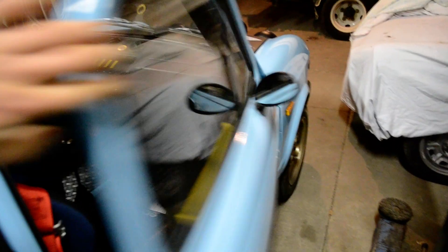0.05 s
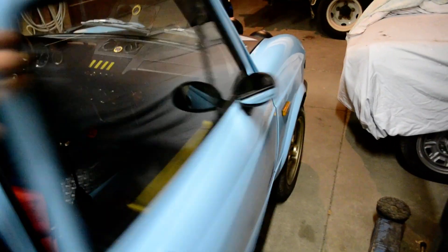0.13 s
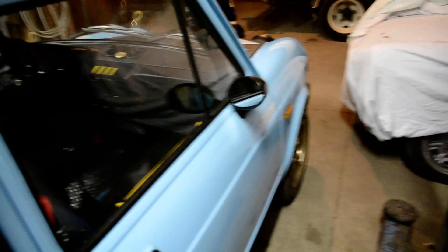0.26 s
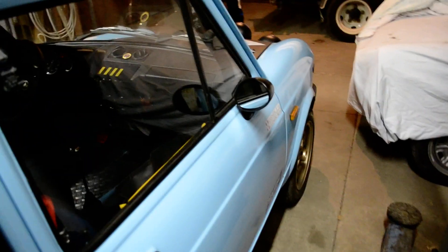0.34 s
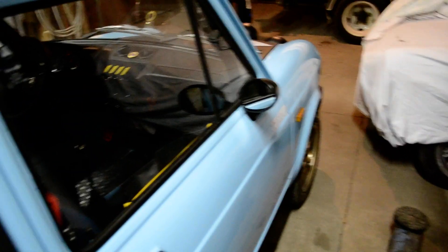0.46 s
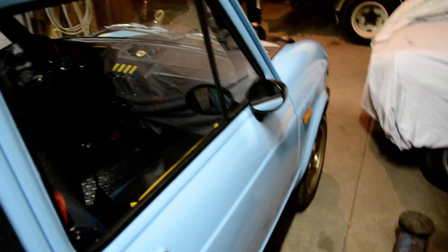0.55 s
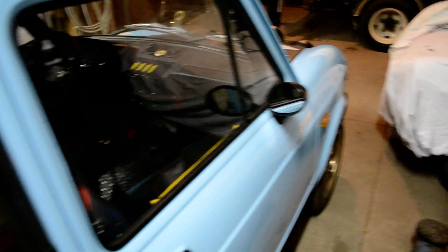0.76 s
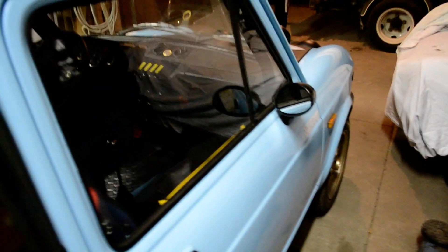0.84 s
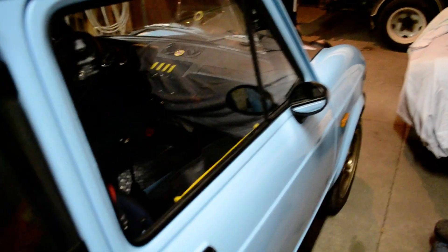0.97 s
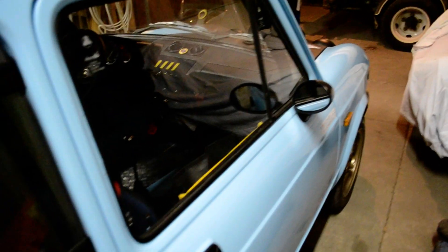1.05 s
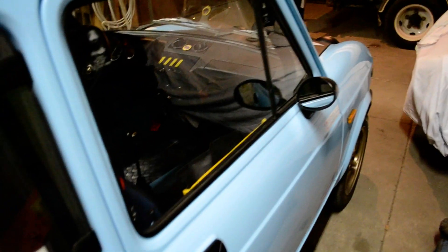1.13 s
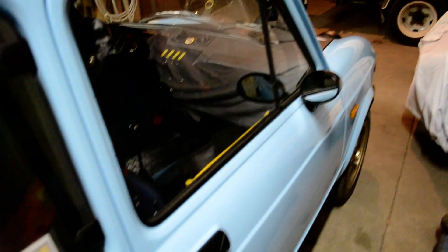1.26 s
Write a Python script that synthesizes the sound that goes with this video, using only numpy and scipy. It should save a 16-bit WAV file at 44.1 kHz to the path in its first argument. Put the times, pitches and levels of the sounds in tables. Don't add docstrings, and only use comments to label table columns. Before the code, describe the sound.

Car door slam: a soft rush of air and brief rubber seal scrape, then one loud distorted metal bang with hollow boom, rattling window and garage reverberation, followed by quiet room hush, small camera knocks and sleeve rustle.

```python
import sys
import numpy as np
from scipy import signal
from scipy.fft import rfft, irfft, next_fast_len
from scipy.io import wavfile

SR = 44100
rng = np.random.default_rng(int(sys.argv[2]) if len(sys.argv) > 2 else 0)


def unload_audio(sound):
    columns = np.transpose(np.atleast_2d(sound))
    steps = np.round(np.clip(columns, -1, 1) * 32767)
    wavfile.write(sys.argv[1], SR, steps.astype(np.int16))


def undo_db(level):
    steps = np.asarray(level, float) / 20
    return 10 ** steps


N = 57330
TIME_S = np.arange(N) / SR
SLAM_S = .2097


def unit(x):
    return x / np.sqrt(np.mean(x ** 2) + 1e-20)


def along(points, hz):
    point_hz, value = np.transpose(points)
    return np.interp(np.log(hz + 1), np.log(point_hz + 1), value)


def filtered(x, response):
    size = next_fast_len(len(x) + SR // 20)
    f = np.fft.rfftfreq(size, 1 / SR)
    return irfft(rfft(x, size) * response(f), size)[:len(x)]


def coloured(x, curve):
    return filtered(x, lambda f: undo_db(along(curve, f)))


def peak(f, hz, width_hz):
    damping = 1j * f * width_hz
    return damping / (hz * hz - f * f + damping)


def rise(t, attack_s):
    return 1 - np.exp(-t / attack_s)


def add(out, s, x):
    part = out[round(s * SR):][:len(x)]
    part += x[:len(part)]


def dying(t60s):
    hz, t, z = signal.stft(rng.standard_normal(N), SR, nperseg=512)
    fade = undo_db(-60 * t / along(t60s, hz)[:, None])
    return signal.istft(z * fade, SR, nperseg=512)[1][:N]


def contacts(rows, width):
    out, t = np.zeros(N), np.arange(SR // 16) / SR
    for s, db, hz, t60 in rows:
        fade = undo_db(-60 * t / t60) * rise(t, .0002)
        band = filtered(rng.standard_normal(len(t)), lambda f: peak(f, hz, width * hz) ** 2)
        level = undo_db(db - 6) * np.sqrt(np.mean(fade ** 2))
        add(out, s, level * unit(fade * band))
    return out


def ringing(modes, attack_s):
    out = np.zeros(N)
    for hz, db, t60 in modes:
        phase, twin_phase, spread = rng.random(3)
        twin_hz = hz * (1 + 0.022 * (spread - .5))
        pair = np.sin(2 * np.pi * (hz * TIME_S + phase))
        pair += 0.5 * np.sin(2 * np.pi * (twin_hz * TIME_S + twin_phase))
        out += undo_db(db - 60 * TIME_S / t60) * pair
    return out * rise(TIME_S, attack_s)


# start in s, peak in dB, centre in Hz, t60 in s.
LATCH_BLOWS = [(.2045, -28, 1700, 0.017), (.2078, -12, 1398, 0.037), (.2097, 7, 1411, 0.019),
               (.2100, -2.5, 2900, .018), (.2122, 3.5, 1200, 0.014), (.2165, -5, 1700, 0.012),
               (.2180, -9.5, 3300, 0.048), (.2255, -2.5, 850, .022), (.2283, -6.5, 850, .022),
               (.2400, -10.5, 1700, 0.067), (.2450, -13.5, 400, 0.11), (.2590, -12, 450, .07),
               (.2990, -14.5, 890, 0.11), (.3580, -20, 704, 0.047)]


def latch_blows():
    return contacts(LATCH_BLOWS, .9)


# frequency in Hz, level in dB, t60 in s.
STRIKER_MODES = [(1252, -12, 0.081), (1775, -11.5, 0.051), (2374, -15, .05), (3383, -12.5, .07),
                 (3550, -13.5, 0.073)]


def striker():
    return ringing(STRIKER_MODES, .0004)


# frequency in Hz, level in dB, t60 in s.
PANEL_MODES = [(135, -18.5, 0.82), (343.4, -15.5, 0.35), (449.7, -2.5, 0.16), (568, -19, 0.51),
               (595.4, -15.5, 0.38), (645, -7.5, 0.43), (802, -1.5, 0.29), (999, -10.5, 0.45),
               (1168, -19.5, 0.66), (1238, -11, 0.27), (1319, -27, 0.73), (1394, -12.5, 0.38)]


def panels():
    return undo_db(-25) * ringing(PANEL_MODES, .03)


# frequency in Hz, level in dB, t60 in s.
CABIN_MODES = [(33, -1, 1.35), (54.7, -2.5, 1.6), (89.8, 3.5, 1.1), (110, -7, 1.8), (118, -8, 2.2),
               (132.1, 9, .8), (161, -5, 1.4), (205, 10.5, .45), (257.9, 8.5, 0.41), (352, 1, 1.3)]


def cabin():
    return undo_db(-40.5) * ringing(CABIN_MODES, .017)


# frequency in Hz, density in dB per Hz.
SHELL_COLOUR = [(30, -21.5), (70, -23), (160, -6.5), (440, -5), (800, -5.5), (1400, -9), (3500, -14.5),
                (4600, -17.5), (9000, -28.5)]
# frequency in Hz, t60 in s.
SHELL_DECAY = [(60, 1.3), (150, 0.73), (500, 0.5), (2000, 0.57), (3500, 0.57), (5000, .38), (8000, .33)]


def shell():
    noise = coloured(dying(SHELL_DECAY), SHELL_COLOUR)
    noise = noise / np.std(noise[:SR // 20])
    return undo_db(-16.5) * noise * rise(TIME_S, .008)


def body():
    out = np.zeros(N)
    add(out, SLAM_S, shell() + panels() + cabin() + striker())
    return out


# start in s, peak in dB, centre in Hz, t60 in s.
RATTLE_HITS = [
    (.2097, -18, 5800, 0.021),
    (.2255, -17, 9100, .025),
    (.2390, -6.5, 7000, .022),
    (.2450, -22, 7500, .08),
    (.2560, -21.5, 7000, .03),
    (.2720, -21, 6500, .04),
    (.3000, -27, 6000, .03),
    (.3140, -20.5, 8500, 0.023),
    (.3100, -28, 6340, 0.04),
    (.3310, -25, 5880, 0.038),
]


def rattles():
    return contacts(RATTLE_HITS, .7)


# centre in Hz, width in Hz, level in dB.
SEAL_RESONANCES = [(220, 150, -9), (550, 170, -2.5), (930, 120, -3), (1280, 300, -2), (1750, 340, -2.5),
                   (2200, 850, -7), (4700, 3200, -24.5), (8000, 6000, -39)]


def seal():
    start_s, slips_per_s = .1635, 2500
    start_db, swell_db, attack_s = -40, 3, .005
    t = np.arange(round((SLAM_S - start_s) * SR)) / SR
    slips = (rng.random(len(t)) < slips_per_s / SR) * rng.standard_normal(len(t))
    slips += .08 * rng.standard_normal(len(t))

    def door(f):
        return sum((-1) ** k * undo_db(db) * peak(f, hz, width_hz) ** 2
                   for k, (hz, width_hz, db) in enumerate(SEAL_RESONANCES))

    out = np.zeros(N)
    swell = undo_db(start_db + swell_db * t / t[-1])
    add(out, start_s, unit(filtered(slips, door)) * swell * rise(t, attack_s))
    return out


def swing():
    level_db, swell_db = -69, 4
    air = unit(filtered(rng.standard_normal(N), lambda f: peak(f, 267, 260) ** 2))
    return undo_db(level_db + swell_db * TIME_S / SLAM_S) * (TIME_S < SLAM_S) * air


# frequency in Hz, t60 in s.
NEAR_DECAY = [(50, 1.6), (150, 1.1), (500, 0.55), (2000, 0.53), (3500, 0.62), (5000, .42), (8000, 0.27)]
# frequency in Hz, t60 in s.
FAR_DECAY = [(50, 1.4), (500, 1.63), (2000, 1.15), (4000, 0.68), (8000, .4)]


def garage(x):
    level_db, far_db, wall_s = -8, -18, .018
    near, far = dying(NEAR_DECAY), dying(FAR_DECAY)
    tail = near / np.linalg.norm(near) + undo_db(far_db) * far / np.linalg.norm(far)
    delayed = np.pad(x, (round(wall_s * SR), 0))
    return undo_db(level_db) * signal.fftconvolve(delayed, tail)[:N]


# start in s, peak in dB, centre in Hz, t60 in s.
CAMERA_TICKS = [
    (.1420, -43.5, 3450, .018),
    (.7365, -50.5, 7000, 0.064),
    (.7600, -50, 8000, .06),
    (.9920, -41.5, 4240, 0.0092),
    (1.0130, -45.5, 5500, 0.022),
    (1.0400, -51, 4000, 0.014),
    (1.1650, -48, 8500, .02),
    (1.1780, -47, 8000, .02),
    (1.2285, -42, 8500, .015),
]


def ticks():
    return contacts(CAMERA_TICKS, 1.3)


# start in s, peak in dB, centre in Hz, t60 in s.
CAMERA_KNOCKS = [
    (.1430, -53, 708, .03),
    (.7600, -39.5, 1600, 0.032),
    (.7720, -55, 2340, 0.046),
    (.7800, -47, 1996, 0.079),
    (1.0665, -45.5, 1190, 0.024),
    (1.1200, -55.5, 1510, 0.069),
    (1.1320, -47.5, 1280, 0.051),
    (1.2290, -50, 3700, .025),
]


def knocks():
    return contacts(CAMERA_KNOCKS, .9)


# time in s, level in dB.
SLEEVE_STROKE = [(.05, -87), (.17, -61), (0.208, -72.5), (.3, -81), (.96, -85), (1.0, -68), (1.035, -69),
                 (1.055, -80), (1.085, -66.5), (1.14, -65.5), (1.155, -91), (1.168, -60.5), (1.2, -65),
                 (1.245, -60.5), (1.28, -48.5)]
# frequency in Hz, density in dB per Hz.
RUB_COLOUR = [(700, -16), (1700, -5), (2200, -6), (2650, 1), (3200, -7.5), (3950, -2), (5000, -11),
              (7900, -20)]
# frequency in Hz, density in dB per Hz.
BRUSH_COLOUR = [(1000, -13), (5000, -3), (7900, -7.5), (9700, 3.5), (11500, 0.5)]


def fibres(colour):
    catches_per_s = 2500
    catches = (rng.random(N) < catches_per_s / SR) * rng.standard_normal(N)
    return unit(coloured(catches + .15 * rng.standard_normal(N), colour))


def sleeve():
    brush_gain_db, brush_top_db = 5, -58.5
    stroke_db = np.interp(TIME_S, *np.transpose(SLEEVE_STROKE))
    brush_level = 1 / (undo_db(-stroke_db - brush_gain_db) + undo_db(-brush_top_db))
    return undo_db(stroke_db) * fibres(RUB_COLOUR) + brush_level * fibres(BRUSH_COLOUR)


# frequency in Hz, density in dB per Hz.
HUSH_COLOUR = [(25, -27.5), (60, -14), (120, -8), (400, -1.5), (1000, -4), (3000, -10), (6000, -17.5),
               (10000, -21.5)]


def hush():
    return undo_db(-63.5) * unit(coloured(rng.standard_normal(N), HUSH_COLOUR))


def scene():
    door = latch_blows() + rattles() + seal()
    camera = ticks() + knocks() + sleeve()
    return (door + body() + garage(door) + swing() + camera + hush())[None]


def top_cut(x):
    return signal.sosfilt(signal.butter(12, 16300, fs=SR, output="sos"), x)


# frequency in Hz, gain in dB.
MIC_RESPONSE = [(20, -5), (100, 1), (3700, -0.5), (4500, -0.5), (5500, 1.5), (9000, -0.5), (10600, -4.5),
                (11600, -29), (12500, -57.5), (22000, -92)]
# frequency in Hz, gain in dB.
INPUT_RESPONSE = [(20, 0.5), (10000, 0), (13000, -6.5), (15900, -13.5), (16300, -70)]


def record(dry):
    ceiling, knee = .67, 20
    x = coloured(dry[0], MIC_RESPONSE)
    x = x / (1 + np.abs(x / ceiling) ** knee) ** (1 / knee)
    x = coloured(x, INPUT_RESPONSE)
    return top_cut(x[None])


dry = scene()
out = record(dry)
unload_audio(out)
```